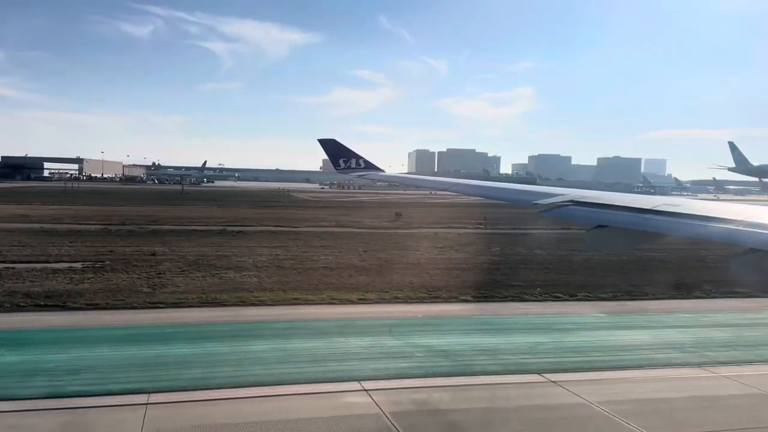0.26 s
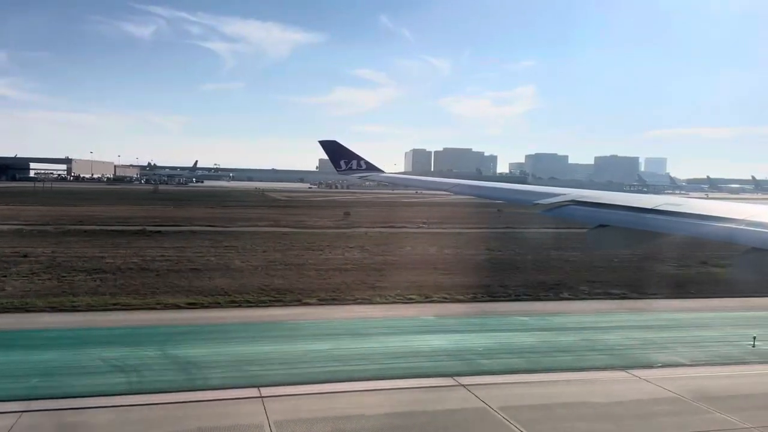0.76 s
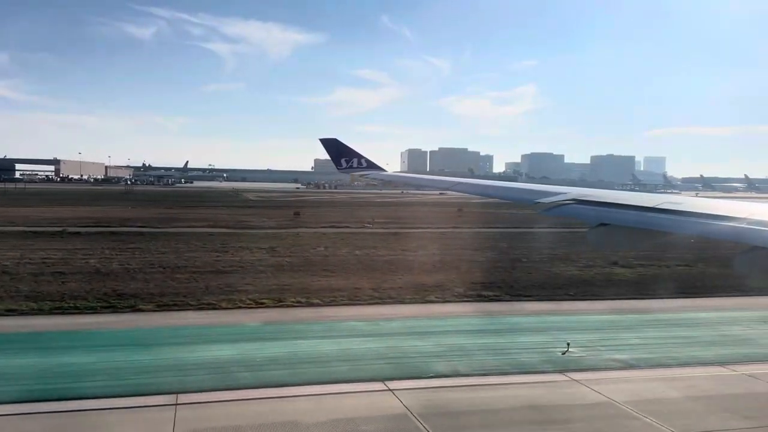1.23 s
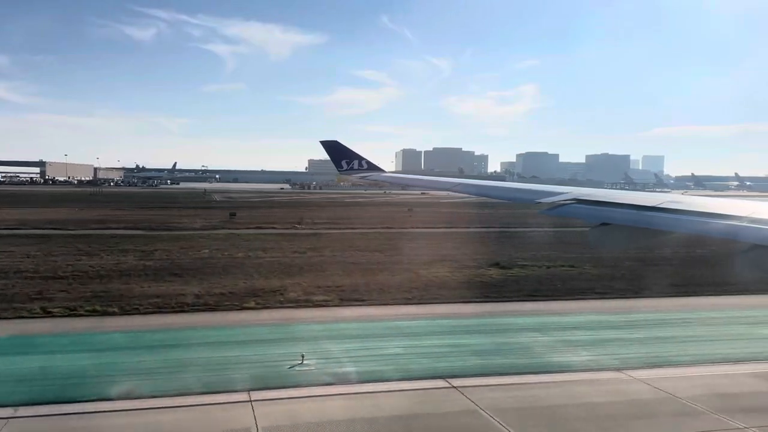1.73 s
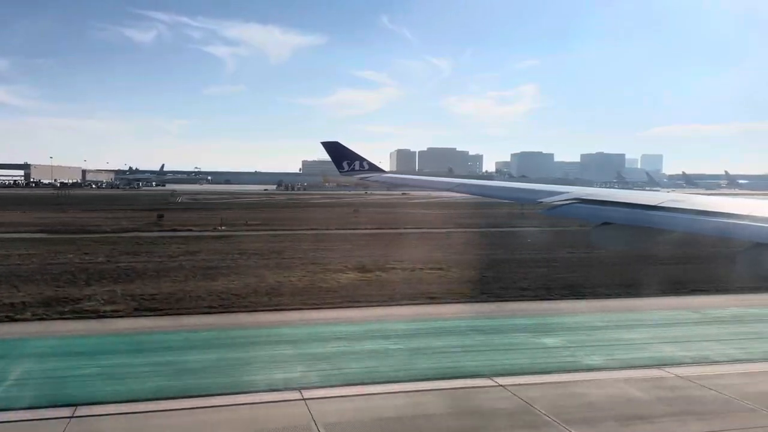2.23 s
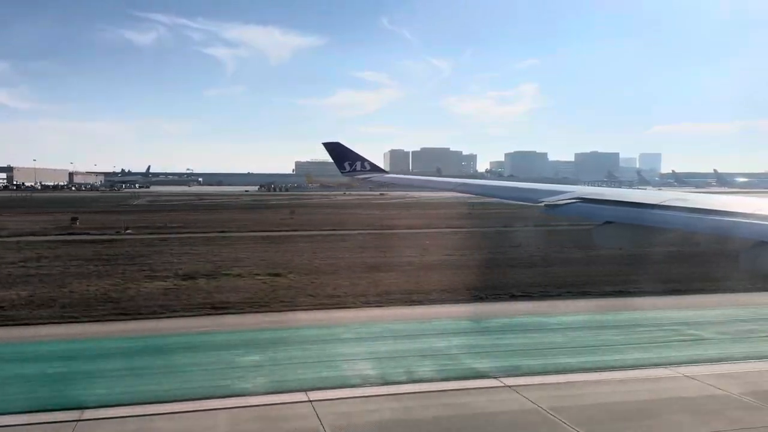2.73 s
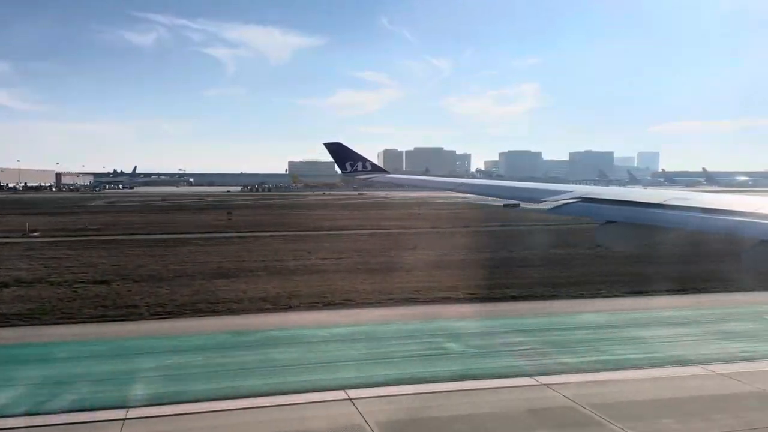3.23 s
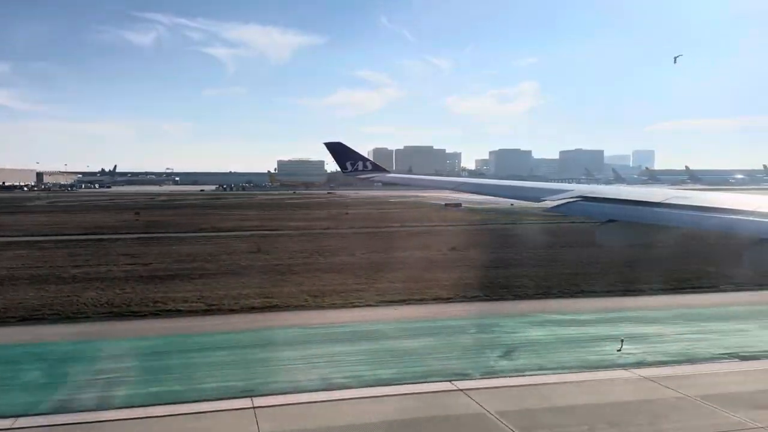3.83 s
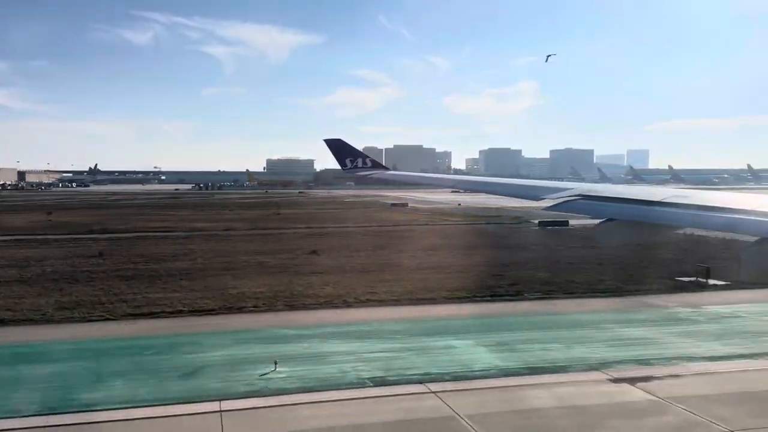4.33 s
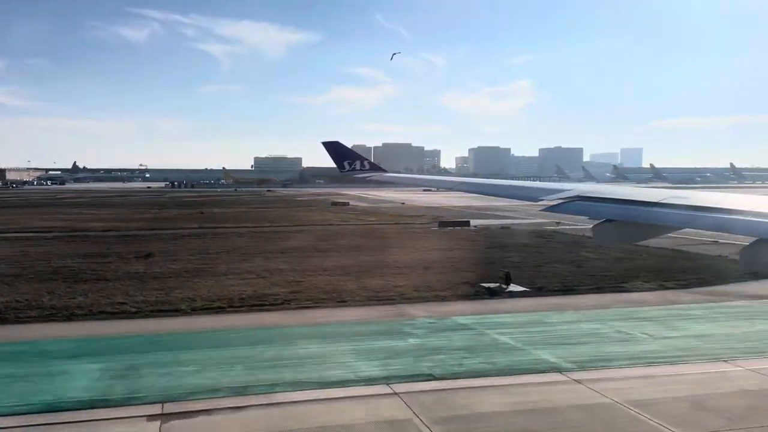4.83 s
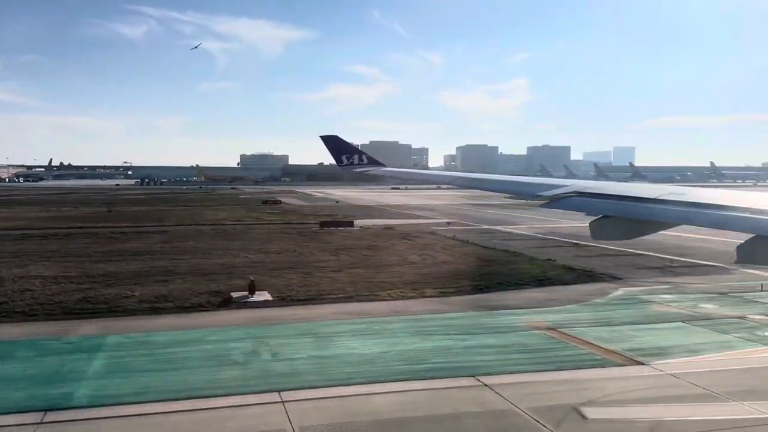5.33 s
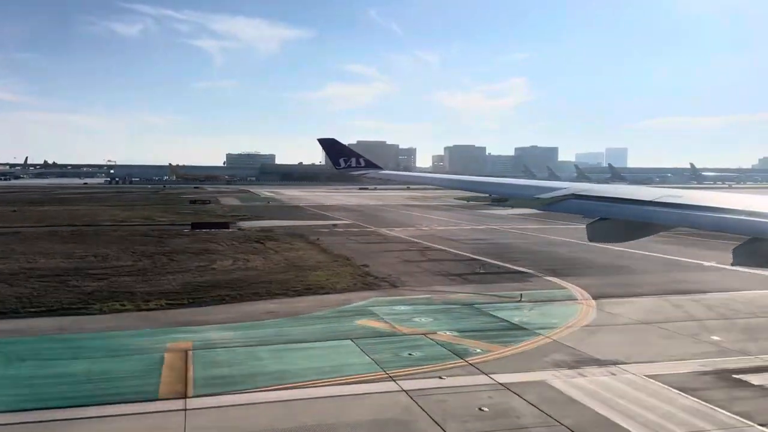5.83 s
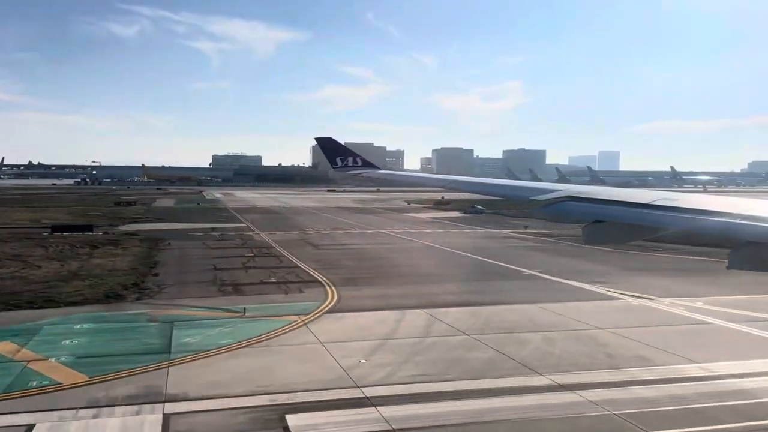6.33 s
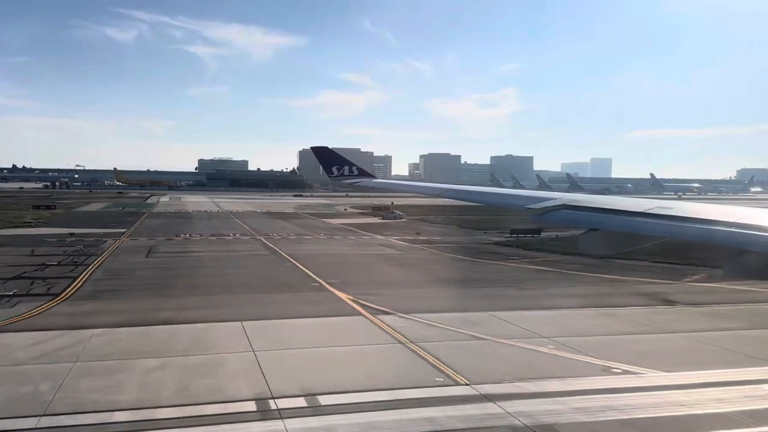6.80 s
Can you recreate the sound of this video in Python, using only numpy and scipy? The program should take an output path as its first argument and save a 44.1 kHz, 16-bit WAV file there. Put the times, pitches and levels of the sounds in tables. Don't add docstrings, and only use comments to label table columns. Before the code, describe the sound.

Heavy bass engine rumble fills an airliner cabin as it rolls over bumps, trim crackling and buzzing lightly, a small metal tink early on.

```python
import sys
import numpy as np
from scipy import signal
from scipy.fft import rfft, irfft
from scipy.io import wavfile
from scipy.ndimage import uniform_filter1d, minimum_filter1d

SR = 44100
rng = np.random.default_rng(int(sys.argv[2]) if len(sys.argv) > 2 else 0)


def wav_record(signal):
    frames = np.transpose(np.atleast_2d(signal))
    bounded = np.clip(frames, -1, 1)
    quanta = np.round(bounded * 32767).astype(np.int16)
    wavfile.write(sys.argv[1], SR, quanta)


def field_ratio(decibels):
    return 10 ** (np.asarray(decibels, dtype=float) / 20)


N = 311346
HZ = np.fft.rfftfreq(N, 1 / SR) + 1e-3


def at_hz(points):
    hz, value = np.transpose(points)
    return np.interp(np.log(HZ), np.log(np.maximum(hz, 1)), value)


def closed(points, edge_db):
    low, high = points[0], points[-1]
    below = (low[0] / 16, low[1] - 4 * edge_db)
    above = (high[0] * 16, high[1] - 4 * edge_db)
    return field_ratio(at_hz([below, *points, above]))


def rms_one(x):
    return x / np.sqrt(np.mean(x ** 2) + 1e-20)


def drift(rate_hz):
    r = np.exp(-2 * np.pi * rate_hz / SR)
    noise = rng.standard_normal(N + SR)
    return rms_one(signal.lfilter([1], [1, -2 * r, r * r], noise)[SR:])


def steadied(x, span_s, share):
    power = uniform_filter1d(np.mean(x ** 2, axis=0), int(span_s * SR))
    return rms_one(x / (power + 1e-3) ** (np.clip(share, 0, 1) / 2))


# frequency in Hz, likeness from 0 to 1, phase lead of the left in radians,
# left minus right level in dB.
PORTS_LOW = [(40, 1, .02, 0), (100, .995, .12, 0), (160, .98, .1, .6), (200, .87, -.08, -.8),
             (250, .99, -.07, .8), (350, .96, .08, 2), (420, .85, -.1, 4), (500, .45, -1.45, 2),
             (650, .45, -1.3, -2.5), (900, .55, -1.9, 0), (1200, .5, -1.5, 2), (1600, .65, -3, -2),
             (1800, .65, -5.5, 1)]
PORTS_HIGH = [(2200, .6, -5.85, 2.5), (3000, .38, -5.5, 3), (5000, .38, -5.4, 5), (6500, .6, -5.2, 3),
              (7500, .55, -3.9, 6), (8000, .85, -.6, 3), (8500, .95, -.25, 1), (9600, .75, -.6, 0),
              (10000, .995, -3.14, 0), (12500, .995, -3.14, 0), (13000, .95, -6.2, 0),
              (16000, .99, -6.3, 0)]


def at_ports(pair, gain, scatter=0.):
    mid, side = rfft(pair) * gain
    hz, *columns = np.transpose(PORTS_LOW + PORTS_HIGH)
    alike, lead, tilt_db = [np.interp(HZ, hz, c) for c in columns]
    alike = alike * (1 - np.clip(scatter, 0, 1))
    left = field_ratio(tilt_db / 2) * np.exp(.5j * lead)
    mid = np.sqrt(1 + alike) * mid
    side = np.sqrt(1 - alike) * side
    return rms_one(irfft([(mid + side) * left, (mid - side) / left], N))


# time in seconds, level in dB.
RUNWAY = [(0.0, -61.5), (0.19, -62), (0.72, -61), (1.1, -61), (1.43, -62.5), (1.76, -63.5), (1.94, -60.5),
          (2.19, -64.5), (3.53, -65), (4.31, -63), (5.45, -64.5), (6.23, -68.5), (6.35, -66.5), (6.9, -67),
          (7.04, -66.5)]
# start in seconds, length in seconds, extra shaking in dB.
JOLTS = [(0.033, 0.038, 6), (0.102, 0.027, 7.5), (0.287, 0.033, 8.5), (0.553, 0.064, 5),
         (0.726, 0.039, 6.9), (0.79, 0.038, 8.5), (0.918, 0.043, 4.5), (1.28, 0.053, 7),
         (1.376, 0.029, 6.5), (1.53, 0.026, 4), (1.799, 0.053, 6.5), (2.062, 0.031, 4.5),
         (2.528, 0.025, 6.5), (2.59, 0.032, 6.5), (3.018, 0.033, 9), (3.114, 0.029, 3), (3.352, 0.022, 9.5),
         (4.154, 0.031, 7.5), (4.363, 0.047, 5.5), (4.484, 0.043, 4.5), (4.665, 0.032, 6), (4.93, 0.036, 6),
         (5.138, 0.047, 6.7), (5.221, 0.023, 6.5), (5.322, 0.047, 4), (5.401, 0.068, 4), (6.31, 0.032, 8),
         (6.377, 0.032, 8.9), (6.501, 0.027, 7), (6.614, 0.028, 3.5)]
# start in seconds, length in seconds, extra shaking in dB.
SLABS = [(0.351, .07, 5.5), (.845, .03, 4), (1.858, .03, -4.5), (2.729, .08, 6), (3.054, .04, -5),
         (3.278, .04, 5.5), (3.798, .08, 4), (3.981, .03, 4.5), (4.072, .05, -4.5), (5.782, .04, -4),
         (6.219, .07, -6.5), (6.74, .06, -5.5), (2.201, .03, 4), (2.861, .03, 3), (3.528, .06, 2.5),
         (3.66, .1, -3), (4.24, .03, 3.5), (6.419, .06, 3), (0.999, .1, -2.5), (2.628, .09, -3)]
JOLT_EDGE_S, JOLT_SHARE = 0.013, 0.81


def shaking():
    t = np.arange(N) / SR
    times, levels_db = np.transpose(RUNWAY)
    shake_db = np.interp(t, times, levels_db)
    for start_s, length_s, extra_db in JOLTS + SLABS:
        inside = np.minimum(t - start_s, start_s + length_s - t) / JOLT_EDGE_S + .5
        shake_db = shake_db + JOLT_SHARE * extra_db * np.clip(inside, 0, 1)
    return shake_db - shake_db.mean()


# frequency in Hz, density in dB per Hz.
RUMBLE = [(22, -30), (36, -11), (52, -4), (68, 1), (82, -2.5), (108, 2.5), (145, -6), (172, 0), (200, -8),
          (250, -6), (272, -12.5), (330, -16.5), (385, -25.5), (430, -24)]
# frequency in Hz, density in dB per Hz.
ROAR = [(330, -3.5), (440, -10.5), (500, -22.5), (560, -15), (630, -17), (706, -15), (960, -24.5),
        (1130, -26), (1400, -30), (1600, -33), (2000, -44.5), (2500, -44), (2800, -53), (3500, -51)]
RUMBLE_SPLIT_HZ = 90
LOAD_DB, LOAD_SAG_DB_PER_S = -11.5, 0.3678
DEEP_DB, BOOM_DB, ROAR_DB = -3.5, -0.5, -33
ROAR_FOLLOWS, ROAR_SHAKES = 0.87, 0.21
ROAR_GUST_DB = 0.84


def engines(shake_db):
    load_db = LOAD_DB - LOAD_SAG_DB_PER_S * np.arange(N) / SR
    upper = 1 / (1 + (RUMBLE_SPLIT_HZ / HZ) ** 16)
    bass = closed(RUMBLE, edge_db=28.0)
    deep = at_ports(rng.standard_normal((2, N)), bass * np.sqrt(1 - upper))
    boom = at_ports(rng.standard_normal((2, N)), bass * np.sqrt(upper))
    roar = at_ports(rng.standard_normal((2, N)), closed(ROAR, edge_db=24.0))
    rumble = field_ratio(DEEP_DB) * steadied(deep, 0.25, 0.05) + field_ratio(BOOM_DB) * steadied(boom, 0.073, 0.45)
    roar_db = ROAR_DB + ROAR_FOLLOWS * (load_db - load_db.mean())
    roar_db = roar_db + ROAR_SHAKES * shake_db + ROAR_GUST_DB * drift(6)
    return field_ratio(load_db) * rumble + field_ratio(roar_db) * roar


# frequency in Hz, density in dB per Hz.
HISS = [(1500, -13), (3000, -4.5), (5500, -1.5), (7600, 1), (8100, -5.5), (9500, 1), (10000, -10),
        (12500, -21), (14400, -8.5), (16000, -11)]
HISS_DB, VENT_FOLLOWS = -71, .3


def vents(shake_db):
    hiss = at_ports(rng.standard_normal((2, N)), closed(HISS, edge_db=17.0))
    return field_ratio(HISS_DB + VENT_FOLLOWS * shake_db) * hiss


# time in seconds, peak level in dB.
PANEL_KNOCKS = [(0.0193, -45), (0.0389, -38.5), (0.079, -40.5), (0.1113, -42.5), (0.3011, -40.5),
                (0.385, -43), (0.5489, -39), (0.5822, -43), (0.6308, -44), (0.7395, -45.5), (0.8125, -42.5),
                (0.8617, -42), (0.9403, -48.5), (1.294, -43.5), (1.5483, -39), (1.812, -45.5), (1.954, -43),
                (2.0792, -44.5), (2.5356, -44.5), (2.607, -46), (3.028, -44), (3.1321, -44.5),
                (3.3133, -45.5), (3.3446, -45), (3.3685, -40.5), (4.1689, -44.5), (4.346, -47),
                (5.142, -44.5), (5.238, -44), (6.3818, -40)]
# frequency in Hz, density in dB per Hz.
PANEL = [(600, -0.5), (1200, 13.5), (2300, 4.5), (3300, -2.5), (4200, -5.5), (4800, -2), (5500, -6.5),
         (6500, -2), (7600, -1), (8100, 3), (9500, -2.5), (10000, -8), (12500, -16), (14400, -4),
         (16000, -6.5)]
# frequency in Hz, density in dB per Hz.
PANEL_BODY = [(900, -6.5), (1300, -0.5), (2000, 1.5), (2500, -4), (3300, -7.5)]
KNOCK_S = 0.0023
BODY_FOLLOWS, BODY_DB, CROWD_FOLLOWS, CROWD_DB = 0.97, -69.5, 0.64, -62.5
LIGHT_PER_S, LIGHT_DB, LIGHT_SPREAD_DB, LIGHT_FOLLOWS = 41, -50.5, 3, 0.36


def trim(hull, shake_db):
    swing = 1 + 0.27 * np.maximum(rms_one(hull.mean(axis=0)), 0) ** 2
    touched = rng.random(N) < 350 * swing / SR
    touches = touched * field_ratio(2.0 * np.minimum(rng.exponential(1, N), 3))
    fade = np.exp(-1 / (.0015 * SR))
    crowd = 0.81 + rms_one(signal.lfilter([1], [1, -fade], touches + 1e-18))

    body_db = BODY_FOLLOWS * shake_db + BODY_DB + 1.5 * drift(8)
    body = uniform_filter1d(crowd, int(0.0097 * SR)) * field_ratio(body_db)
    crowd *= field_ratio(CROWD_FOLLOWS * shake_db + CROWD_DB + 1.2 * drift(15))

    light_db = LIGHT_DB + LIGHT_FOLLOWS * shake_db + LIGHT_SPREAD_DB * rng.uniform(-1.7, 1.5, N)
    blows = (rng.random(N) < LIGHT_PER_S / SR) * field_ratio(light_db)
    times, peaks_db = np.transpose(PANEL_KNOCKS)
    blows[(times * SR).astype(int)] = field_ratio(peaks_db + 1.0)
    after = np.arange(int(8 * KNOCK_S * SR)) / SR / KNOCK_S
    rise = 1 - np.exp(-8 * after)
    shape = rise * (np.exp(-after) + 0.72 * np.exp(-4 * after))
    knocks = signal.fftconvolve(blows, shape)[:N]

    out = 0
    for gate, colour, scatter in ((crowd, PANEL, .02), (knocks, PANEL, .3), (body, PANEL_BODY, .01)):
        burst = at_ports(gate * rng.standard_normal((2, N)), closed(colour, edge_db=15), scatter)
        out = out + np.sqrt(np.mean(gate ** 2)) * burst
    return out


def ring(clicks, hz, t60):
    r, w = field_ratio(-60 / (t60 * SR)), 2 * np.pi * hz / SR
    return signal.lfilter([0, np.sin(w)], [1, -2 * r * np.cos(w), r * r], clicks + 1e-18)


# time in seconds, peak level in dB.
TINKS = [
    (0.5492, -44.5),
    (0.582, -45.5),
]
# frequency in Hz, level in dB, T60 in seconds.
BUCKLE = [(4950, -15, .04), (5820, -9, .1), (6400, -7, .04), (8479, 1, 0.1), (9800, -20, .07),
          (12270, -25, .06)]
THUMP_HZ, THUMP_DB, THUMP_T60_S = 670, 22, .035


def buckle():
    times, peaks_db = np.transpose(TINKS)
    at = (times * SR).astype(int)
    out = 0
    for hz, level_db, t60 in BUCKLE:
        bounce_db = 8.5 - 2.1 * hz / 1000 + 16 * (hz > 12000)
        clicks = np.zeros(N)
        clicks[at] = field_ratio(peaks_db + level_db + 1 + np.array([0, bounce_db]))
        out = out + ring(clicks, hz, t60)
    blow = np.zeros(N)
    blow[at[0]:at[0] + 20] = field_ratio(peaks_db[0] + THUMP_DB) / 16
    thump = ring(blow, THUMP_HZ, THUMP_T60_S)
    return (out + thump) * field_ratio(np.array([[1.5], [-1.5]]))


# frequency in Hz, level in dB, T60 in seconds.
LATCH = [(4440, -62, .03), (5900, -58, 0.021), (6300, -48, .02), (7100, -55, .03), (8450, -51, .025)]
LATCH_S = 1.5478


def latch():
    clicks = np.zeros(N)
    clicks[int(LATCH_S * SR) + np.array([0, 60, 130])] = [.6, 1, -.5]
    return sum(field_ratio(level_db) * ring(clicks, hz, t60) for hz, level_db, t60 in LATCH)


def scene():
    shake_db = shaking()
    hull = engines(shake_db)
    return hull + vents(shake_db) + trim(hull, shake_db) + buckle() + latch()


def roll_off(x):
    return signal.sosfilt(signal.butter(12, 16710, fs=SR, output="sos"), x)


BASS_CUT_HZ, TOP_HZ, CEILING = 29, 15720, .9


def record(dry):
    dry = signal.sosfilt(signal.butter(2, BASS_CUT_HZ, "high", fs=SR, output="sos"), dry)
    dry = signal.sosfilt(signal.ellip(10, .5, 70, TOP_HZ, fs=SR, output="sos"), dry)
    need = np.minimum(1, CEILING / (np.max(np.abs(dry), axis=0) + 1e-9))
    reach = int(0.0076 * SR)
    held = minimum_filter1d(need, 2 * reach)
    gain = uniform_filter1d(uniform_filter1d(held, reach), reach)
    return roll_off(dry * gain)


dry = scene()
out = record(dry)
wav_record(out)
```